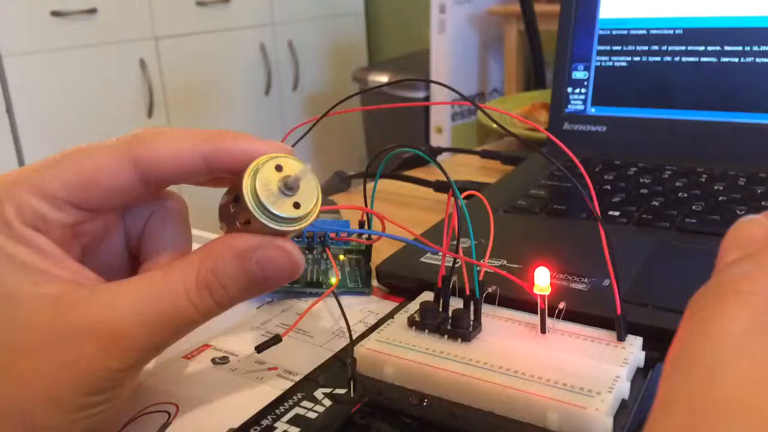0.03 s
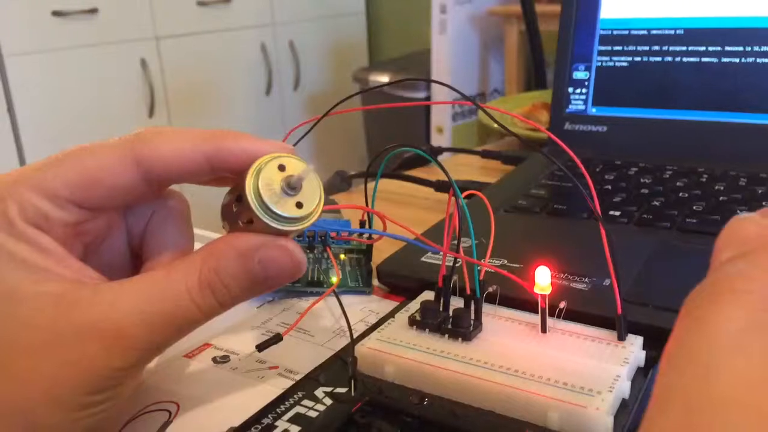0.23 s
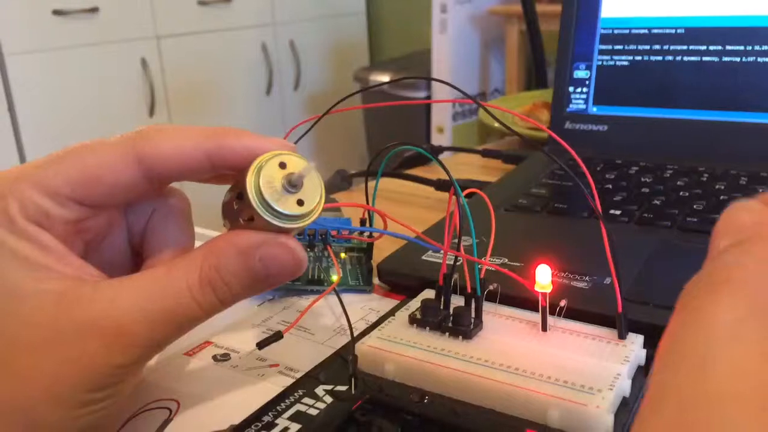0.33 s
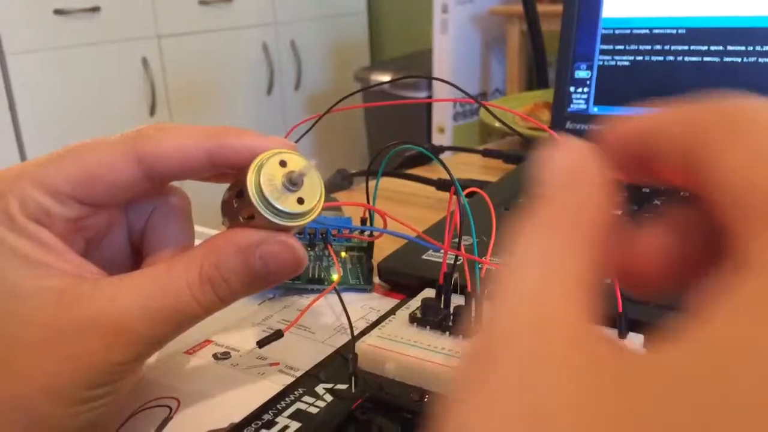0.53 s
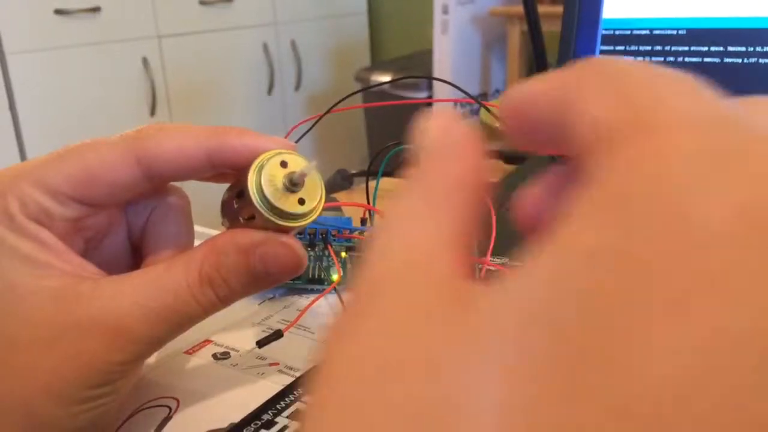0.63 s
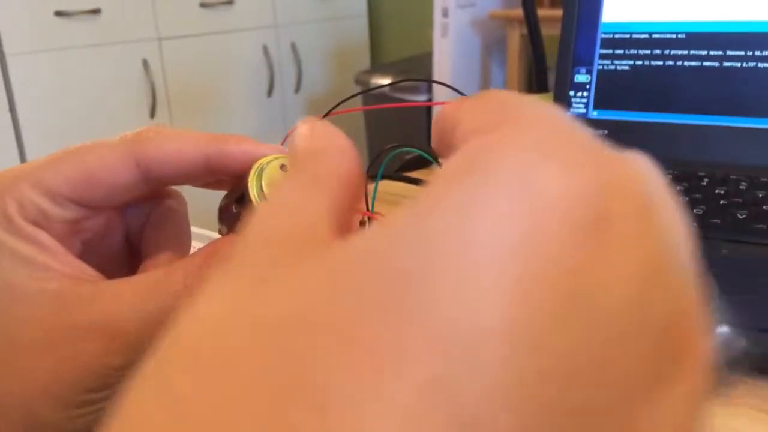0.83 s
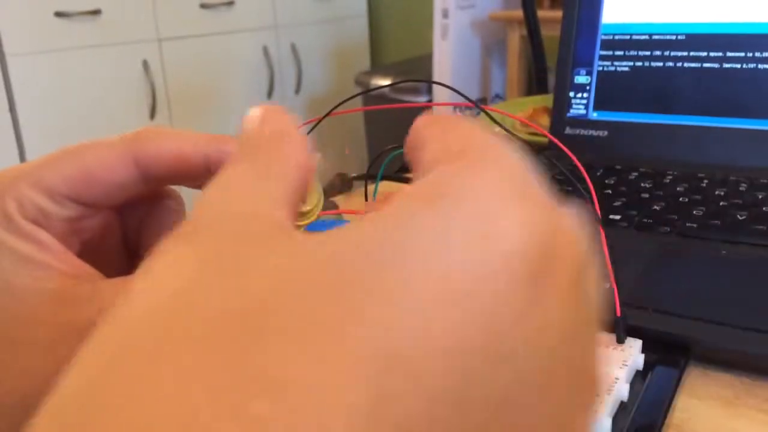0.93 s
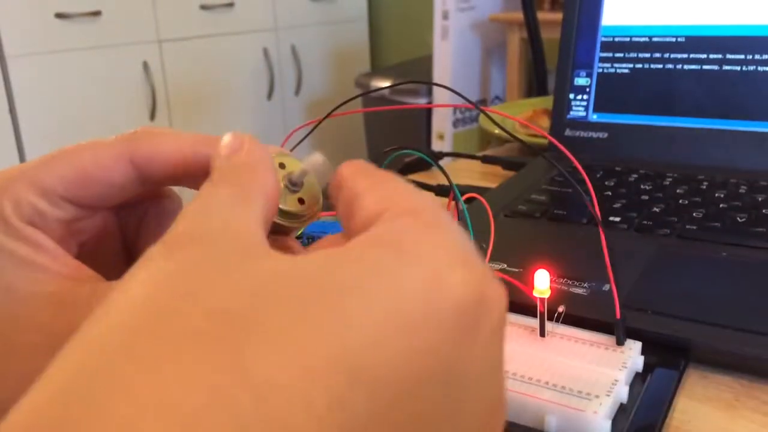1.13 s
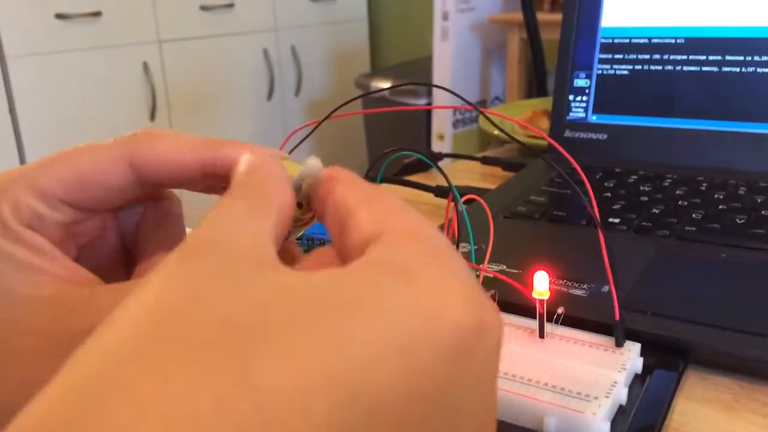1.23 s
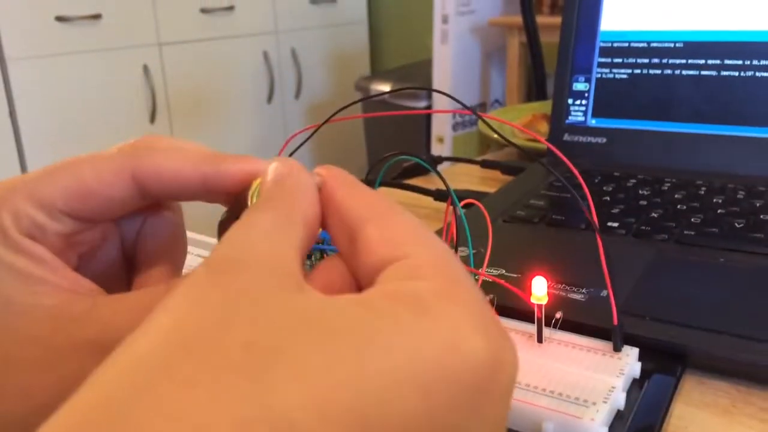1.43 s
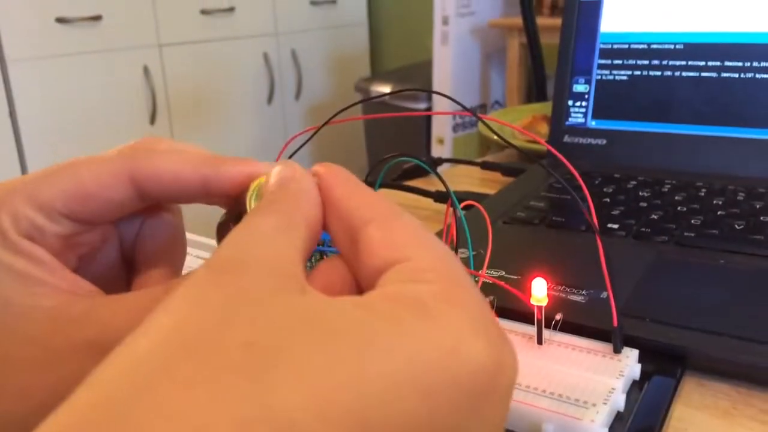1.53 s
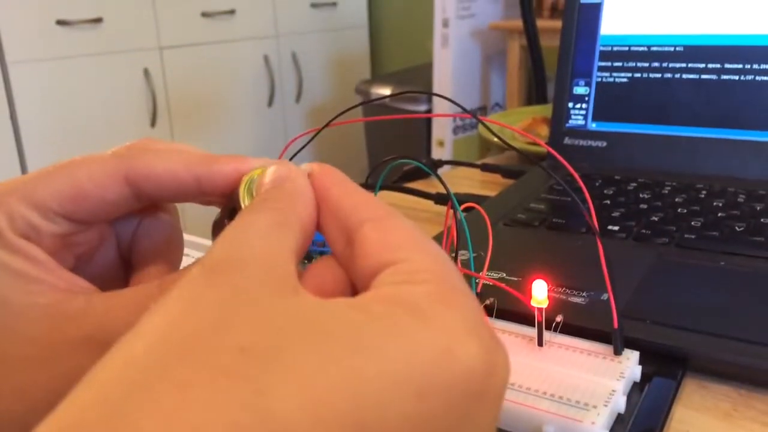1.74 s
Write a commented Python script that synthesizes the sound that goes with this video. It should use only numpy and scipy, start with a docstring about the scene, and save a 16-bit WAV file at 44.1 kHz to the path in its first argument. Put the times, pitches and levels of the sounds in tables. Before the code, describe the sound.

A small electric motor whirs close by on a workbench, a steady hum with a hissing whine. Fingers pinch the spinning shaft, making a brief, rough ticking buzz, and the motor slows to a faint hiss.

```python
"""A small DC motor, held above a workbench, hums at its turning rate while its brushes hiss and whine.
Fingers close on the shaft and damp the hum. By stick-slip friction the shaft catches on the skin
once a turn, a ticking buzz in two pushes. Then the grip drags the motor down, leaving a faint hiss.
The motor's low rumble dips under the grip, then handling noise rises."""
import sys
import numpy as np
from scipy import signal
from scipy.fft import rfft, irfft
from scipy.io import wavfile
from scipy.ndimage import map_coordinates

SR = 44100
rng = np.random.default_rng(int(sys.argv[2]) if len(sys.argv) > 2 else 0)


def transcribe(u):
    """Save the signal u as a 16-bit wav file named by the first command-line argument.

    u: samples, shape (n,) or (channels, n), limited to [-1, 1]; the rate is SR.
    q: integer samples, one column per channel.
    """
    v = np.clip(np.atleast_2d(u).T, -1, 1)
    q = np.round(v * 32767).astype(np.int16)
    wavfile.write(sys.argv[1], SR, q)


N = 79380
TIME = np.arange(N) / SR


# Each row: time in seconds, level of the fundamental in dB.
HUM_LEVEL = [(.12, -33), (.6, -33), (1.0, -33), (1.165, -33.5), (1.2, -53), (1.26, -66), (1.34, -50),
             (1.5, -96)]
# Each row: multiple of the turning rate, level in dB before damping.
OVERTONES = [(2, -60.5), (3, -63.5), (4, -62.5), (5, -87), (6, -59.5), (7, -68.5), (8, -65.5), (9, -71.5),
             (12, -68), (14, -78), (16, -63.5), (20, -72), (23, -75)]
# Damping by the grip. Each row: time in seconds, gain of the overtones in dB.
GRIP_DAMPING = [(1.16, -1.5), (1.26, 1), (1.45, -31)]

def rotor_hum(turns):
    """Forced vibration: an unbalanced rotor shakes the motor at the turning rate, with overtones."""
    fundamental = np.sqrt(2) * from_db(in_time(HUM_LEVEL)[0]) * np.cos(2 * np.pi * turns)
    return fundamental + from_db(in_time(GRIP_DAMPING)[0]) * partials(OVERTONES, turns, waver_db=2.5)


# Each row: multiple of the turning rate, relative level in dB.
WHINE_LINES = [(26, -66.5), (27, -54), (28, -54.5), (29, -55), (59, -52), (60, -54), (61, -47), (63, -53),
               (69, -56)]
# Each row: time in seconds, level of the whine's 30th harmonic in dB.
WHINE_PEAK = [(.12, -56), (.25, -51), (.5, -55.5), (.65, -47), (.9, -48.5), (1.15, -53), (1.25, -54),
              (1.45, -82)]
# Each row: time in seconds, level of the hiss in dB, gain of the whine lines in dB.
BRUSH_LEVELS = [(.12, -37.5, 0.5), (.35, -37.5, -0.5), (.65, -38, 0), (.9, -40, -1), (1.15, -39, -12),
                (1.3, -38, -11), (1.5, -40, -42.5), (1.62, -51.5, -41), (1.72, -59, -48)]
# Spectrum of the sparking. Each row: frequency in Hz, relative level in dB.
SPARK_COLOUR = [(100, -3.5), (300, -7), (650, -12), (950, -4.5), (1200, -7.5), (1900, -11.5), (2150, -4.5),
                (2800, -3.5), (3300, -10.5), (4200, -9.5), (5500, -2), (5850, 0), (6800, -3), (7600, 1),
                (9500, 2.5), (11500, 0.5), (13000, 1), (13800, -5.5), (15200, -0.5)]

def brushes(turns, segments=6, depth=.23):
    """Commutation: periodic contact whines and modulates the amplitude of the brush noise."""
    hiss_gain, whine_gain = from_db(in_time(BRUSH_LEVELS))
    jittered_turns = turns + .0029 * drift(61.3)
    whine = whine_gain * partials(WHINE_LINES, jittered_turns, waver_db=1.5)
    whine += from_db(in_time(WHINE_PEAK)[0]) * partials([(30, 0)], turns, waver_db=2.5)
    angle = 2 * np.pi * turns
    contact = (1 + depth * np.cos(segments * angle)) * (1 + depth * np.cos(2 * angle))
    sparks = rms_one(rng.standard_normal(N) * contact * from_db(1.5 * drift(1500)))
    scrape = rng.standard_normal(N) * contact * (1 + depth * np.cos(angle))
    return whine + hiss_gain * (coloured(sparks, SPARK_COLOUR) + from_db(-11) * motor_can(scrape))


# Each row: frequency in Hz, nominal bandwidth in Hz, relative level in dB.
CAN_MODES = [(4755, 57, 1), (4846, 123, -2), (10230, 340, 1.5)]

def motor_can(scrape):
    """Resonance: the can rings in steep-sided bands around its modes; unit power."""
    return rms_one(sum(from_db(db) * resonate(resonate(scrape, hz, 2 * width), hz, 2 * width)
                       for hz, width, db in CAN_MODES))


def catches(turns, loose_s=1.465):
    """Stick-slip: one impulse a turn, irregular once the motor is dragged down; unit power."""
    times = TIME[1:][np.diff(np.floor(turns)) > 0]
    timing, strength = rng.standard_normal((len(times), 2)).T
    times = times + timing * np.where(times > loose_s, .003, .000015)
    clicks = np.zeros(N)
    clicks[np.clip(np.round(times * SR).astype(int), 0, N - 1)] = from_db(.7 * strength)
    return rms_one(clicks)


# Each row: time in seconds, then relative levels of tick, clack, ring and thump in dB.
CATCH_LEVELS = [(1.16, -52, -50, -63, -60), (1.178, -47, -40, -38, -35.5), (1.197, -42, -31.5, -48, -32.5),
                (1.226, -31, -37, -38, -35.5), (1.255, -26, -40, -42, -38), (1.3, -27.5, -38, -38, -41.5),
                (1.322, -29.5, -37.5, -39.5, -42.5), (1.332, -41, -44, -41.5, -50.5),
                (1.368, -35.5, -43.5, -42, -49), (1.412, -22, -49.5, -43.5, -48),
                (1.442, -28, -36.5, -43.5, -56), (1.47, -35.5, -61, -51, -76), (1.51, -42, -54, -63, -75),
                (1.56, -47, -53, -74, -80), (1.66, -62.5, -71, -84, -86)]
# Spectra of these four parts. Each row: frequency in Hz, relative level in dB.
TICK_COLOUR = [(3000, -35), (5000, -12.5), (6300, -4), (7200, -4), (8300, -3.5), (10000, 1), (11700, 2.5),
               (13200, 3), (15300, 1), (18000, 0.5)]
CLACK_COLOUR = [(700, -24), (1600, -2), (2000, -9.5), (2550, 2), (3100, -4.5), (3600, 3), (4150, 0),
                (4700, 4.5), (5600, -2.5), (8000, -7.5), (15000, -68)]
RING_COLOUR = [(350, -48), (620, -14), (780, -6), (940, 3.5), (1090, -8), (1260, -2), (1420, -4.5),
               (1800, -9), (5000, -72)]
THUMP_COLOUR = [(40, -20), (155, -2), (230, 8), (310, 7.5), (390, -0.5), (470, -1), (625, -15.5),
                (900, -36), (3000, -24.5)]

def finger_buzz(turns, skid_s=.002):
    """Impulse excitation: each catch on the skin sounds four spectra and ends in a short skid."""
    touch = np.interp(TIME, [1.16, 1.175, 1.6, 1.7], [0, 1, 1, 0])
    tick, clack, ring, thump = touch * from_db(in_time(CATCH_LEVELS))
    clicks = catches(turns)
    grains = rms_one(rng.standard_normal(N) * from_db(3.5 * drift(1200)))
    skid_envelope = signal.lfilter([1], [1, -np.exp(-1 / (skid_s * SR))], clicks + 1e-18)
    skids = rms_one(rng.standard_normal(N) * skid_envelope)
    bright = from_db(.5) * coloured(tick * (clicks + from_db(-3.5) * skids), TICK_COLOUR)
    bright += coloured(clack * (clicks + from_db(-7) * skids), CLACK_COLOUR)
    bright += skin_rub(touch * grains)
    body = from_db(-1) * coloured(ring * (clicks + from_db(-10) * grains), RING_COLOUR)
    body += from_db(.5) * coloured(thump * clicks, THUMP_COLOUR)
    return body + knock(clicks) + squeak() + room(bright)


# Each row: time in seconds, level of the rubbing at full touch in dB.
RUB_LEVEL = [(1.17, -50), (1.22, -33), (1.28, -61), (1.32, -39), (1.37, -34.5), (1.41, -30.5), (1.44, -29),
             (1.48, -35), (1.53, -39), (1.57, -43), (1.62, -54), (1.7, -72)]
# Each row: time in seconds, level of the impulse in dB before filtering.
GRIP_SLIPS = [(1.64, -26), (1.726, -41)]
# Each row: frequency in Hz, relative level in dB.
RUB_COLOUR = [(200, -32), (600, -36), (950, -6), (1350, -4), (1800, -4.5), (2500, -3), (3300, -6.5),
              (4700, -3), (6500, 1), (8000, 2.5), (10000, -1.5), (13000, 1), (15000, 3)]

def skin_rub(grains):
    """Sliding friction: skin gives grainy noise, and each small slip of the grip a click."""
    rub = from_db(in_time(RUB_LEVEL)[0]) * grains
    for s, db in GRIP_SLIPS:
        rub[int(s * SR)] += from_db(db)
    return coloured(rub, RUB_COLOUR)


# Each row: frequency in Hz, relative level in dB.
KNOCK_COLOUR = [(30, -12), (80, 2), (160, -3), (320, -6), (470, -4.5), (630, -9), (850, -47), (2500, -22.5)]

def knock(clicks, start_s=1.397, length_s=.025):
    """Impact: the hardest push makes the shaft knock for four turns."""
    pushing = (TIME > start_s) * (TIME < start_s + length_s)
    return from_db(-39) * coloured(pushing * clicks, KNOCK_COLOUR)


def squeak(hz=7525, wander_hz=14):
    """Friction-induced vibration: a brief tone that wavers in pitch and level."""
    phase = 2 * np.pi * np.cumsum(hz + wander_hz * drift(80)) / SR
    return from_db(-40.5 + 2.3 * drift(43)) * bell(1.35, .052) * np.sqrt(2) * np.sin(phase)


# Each row: time in seconds, level in dB.
RUMBLE_LEVEL = [(.12, -57), (1.15, -56), (1.42, -59), (1.46, -74), (1.535, -66), (1.57, -59), (1.65, -53.5),
                (1.72, -57.5), (1.8, -56)]
# Each row: frequency in Hz, relative level in dB.
RUMBLE_COLOUR = [(20, -29), (40, -21), (60, -3), (140, 3), (230, -7), (310, -8.5), (400, -16.5), (700, -22),
                 (2000, -54)]

def rumble():
    """Random vibration: the running motor's low rumble dips under the grip, then handling noise rises."""
    return from_db(in_time(RUMBLE_LEVEL)[0]) * coloured(rng.standard_normal(N), RUMBLE_COLOUR)


# Each row: frequency in Hz, relative level in dB.
IDLE_COLOUR = [(300, -5), (800, -2), (1900, 1), (3200, -15.5), (4100, -2), (4400, 13.5), (4700, 22),
               (4980, 12), (5200, 4), (7000, 4), (9950, -12), (10200, 17.5), (10450, 15), (10800, -13),
               (12500, -8), (15000, -6)]

def idle_hiss():
    """Resonant filtering: the powered motor hisses in its can's bands, swelling as it slows."""
    level_db = -53.5 + 6.5 * bell(1.605, .068)
    return from_db(level_db) * coloured(rng.standard_normal(N), IDLE_COLOUR)


def room(x, t60_s=.59, tail_db=-11):
    """Reverberation: a diffuse, exponentially decaying tail follows the direct sound."""
    tail = rng.standard_normal(N) * from_db(-60 * TIME / t60_s) * (TIME > .003)
    return x + from_db(tail_db) * signal.fftconvolve(x, tail / np.linalg.norm(tail))[:N]


def partials(table, turns, waver_db):
    """Harmonic series: sines locked to the shaft, each wavering in level."""
    return sum(np.sqrt(2) * from_db(db + waver_db * drift(14.21))
               * np.sin(2 * np.pi * (multiple * turns + rng.random())) for multiple, db in table)


def coloured(x, colour, size=8192):
    """Minimum-phase filter with the given spectrum; keeps the power of white noise."""
    hz, db = np.transpose(colour)
    gain = from_db(np.interp(np.log(np.fft.rfftfreq(size, 1 / SR) + 1), np.log(hz), db))
    cepstrum = irfft(np.log(gain))
    cepstrum[1:size // 2] *= 2
    cepstrum[size // 2 + 1:] = 0
    response = irfft(np.exp(rfft(cepstrum)))
    return signal.fftconvolve(x, response / np.linalg.norm(response))[:N]


def resonate(x, hz, width_hz):
    """Two-pole resonance with peak gain 1."""
    r = np.exp(-np.pi * width_hz / SR)
    feedback = [1, -2 * r * np.cos(2 * np.pi * hz / SR), r * r]
    return signal.lfilter(np.array([1, 0, -1]) * (1 - r * r) / 2, feedback, x)


def drift(rate_hz):
    """Smooth random wander of spread 1."""
    return rms_one(map_coordinates(rng.standard_normal(N), [TIME * rate_hz + 5], order=3))


def bell(centre_s, half_width_s):
    """Gaussian rise and fall of height 1."""
    return np.exp(-((TIME - centre_s) / half_width_s) ** 2)


def in_time(rows):
    """Linear interpolation of each column over time."""
    s, *columns = np.transpose(rows)
    return [np.interp(TIME, s, c) for c in columns]


def from_db(db):
    """Decibels to gain."""
    return 10 ** (np.asarray(db) / 20)


def rms_one(x):
    """Scale to unit power."""
    return x / np.sqrt(np.mean(x ** 2) + 1e-20)


# Each row: time in seconds, turning rate in turns per second.
SHAFT_SPEED = [(.12, 167.6), (.35, 167.8), (.62, 168.2), (.9, 167.8), (1.184, 167.3), (1.208, 153.5),
               (1.24, 157.3), (1.3, 156.6), (1.328, 148.5), (1.362, 158), (1.382, 154.8), (1.405, 157.6),
               (1.46, 157), (1.57, 136), (1.8, 110)]

def scene(catch_s=1.2578):
    """Superposition: one shaft times hum, brushes and buzz; both channels are alike."""
    turns = np.cumsum(in_time(SHAFT_SPEED)[0]) / SR
    turns -= np.interp(catch_s, TIME, turns)   # a catch falls at this instant
    mix = rotor_hum(turns) + brushes(turns) + finger_buzz(turns) + rumble() + idle_hiss()
    return np.tile(mix, (2, 1))


def record(dry, start_s=.12, cutoff_hz=15450):
    """Gating and band limiting: the sound cuts in after a short silence, its top removed."""
    low_pass = signal.firwin(301, cutoff_hz, window=("kaiser", 8), fs=SR)
    return signal.fftconvolve(dry * (TIME >= start_s), low_pass[None], mode="same", axes=1)


dry = scene()
out = record(dry)
transcribe(out)
```